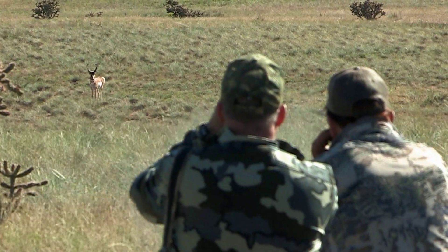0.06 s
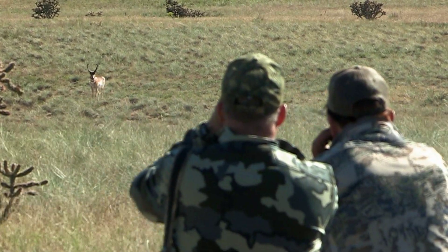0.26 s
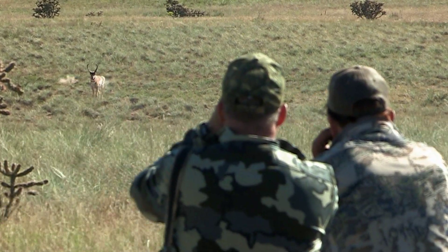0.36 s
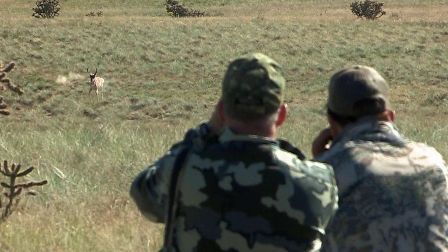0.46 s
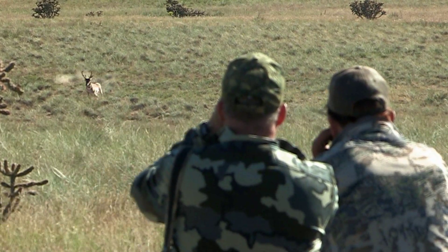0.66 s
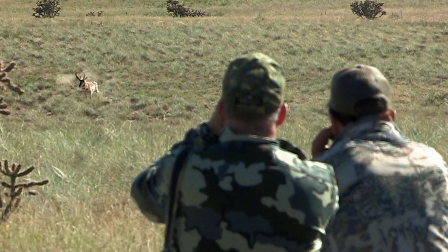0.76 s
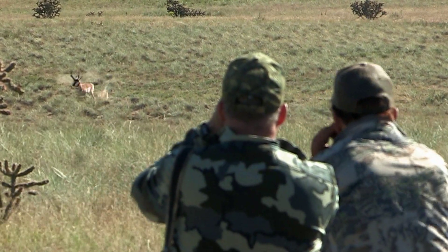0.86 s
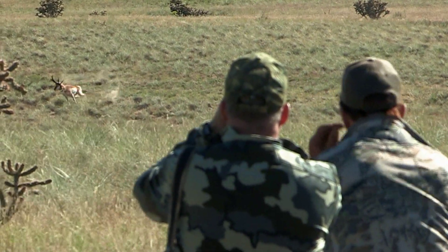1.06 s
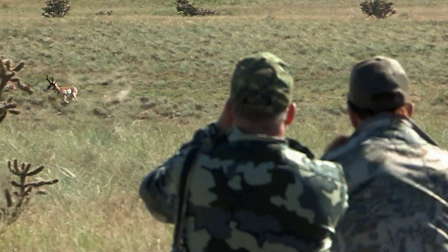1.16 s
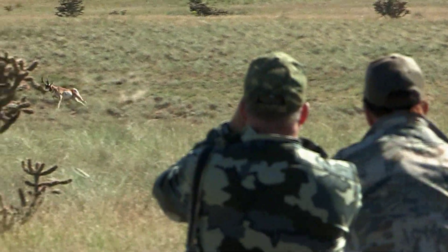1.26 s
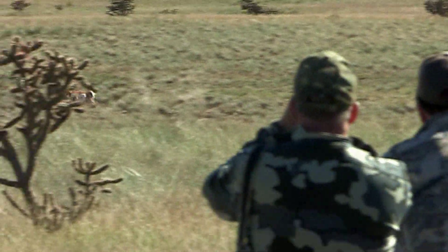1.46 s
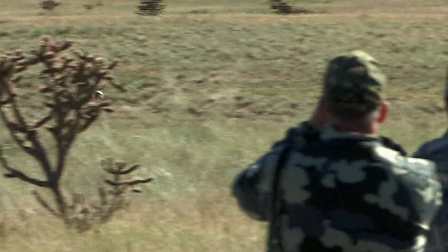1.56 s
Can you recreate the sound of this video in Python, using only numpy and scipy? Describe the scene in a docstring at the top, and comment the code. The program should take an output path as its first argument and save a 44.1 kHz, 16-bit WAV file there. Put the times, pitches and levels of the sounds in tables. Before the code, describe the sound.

A single rifle shot goes off at about 0.3 seconds, a bright crack running into a boom, close enough to overload the microphone. Its echo rolls across the open grassland, growing duller and fading over the next second. The bullet's soft, distant thud comes back at about 1 second, followed by a tiny dry tick near 1.2 seconds. Low wind buffets the microphone throughout, with some light rustling.

```python
"""Open, windy grassland: one rifle shot, close enough to overload the microphone.
A bright crack of shock fronts runs into the boom of the muzzle blast, and the land throws back
a rolling echo that dulls as it fades. The bullet's distant thud comes back late.
Wind buffets the microphone throughout, with some rustling and a few small ticks."""
import sys
import numpy as np
from scipy import signal
from scipy.fft import rfft, irfft
from scipy.io import wavfile
from scipy.ndimage import uniform_filter1d

SR = 44100
rng = np.random.default_rng(int(sys.argv[2]) if len(sys.argv) > 2 else 0)


def wav_out(sig):
    """Save sig, one row per channel (or a flat mono array), as 16-bit PCM at SR to the path in sys.argv[1]."""
    wavfile.write(sys.argv[1], SR, np.round(np.clip(np.atleast_2d(sig).T, -1, 1) * 32767).astype(np.int16))


N = 70560
T = np.arange(N) / SR
SHOT_S = 0.2702
SNAP_RISE_S, ECHO_RISE_S = 0.0012, 0.028


def amp(db):
    """Decibels to gain."""
    return 10 ** (np.asarray(db) / 20)


def unit(x):
    """Scales to rms 1."""
    return x / np.sqrt(np.mean(x ** 2) + 1e-20)


def read(points, hz):
    """Reads a table on a log-frequency axis."""
    f, value = np.transpose(points)
    return np.interp(np.log(hz + 1), np.log(f + 1), value)


def fader(points):
    """Gain ride through (time [s], level [dB]) points."""
    return amp(np.interp(T, *np.transpose(points)))


def coloured(x, colour):
    """Minimum-phase EQ that keeps the power of white noise."""
    hz = abs(np.fft.fftfreq(8192, 1 / SR))
    log_gain = np.log(unit(amp(read(colour, hz))))
    taps = np.fft.ifft(np.exp(np.conj(signal.hilbert(log_gain)))).real
    return signal.fftconvolve(x, taps[:len(taps) // 2])[:N]


def noise(colour):
    """Steady noise of rms 1 with the given spectrum."""
    gain = amp(read(colour, np.fft.rfftfreq(N, 1 / SR)))
    return unit(irfft(rfft(rng.standard_normal(N)) * gain, N))


def steadied(x, size):
    """Evens out the chance swells of a noise over `size` samples."""
    return x / np.sqrt(uniform_filter1d(x ** 2, size) + 1e-9)


def patchy(x, depth_db=2):
    """Lets narrow bands of a noise swell and sink by chance."""
    bands = signal.stft(x, nperseg=512, noverlap=384)[2]
    patches = uniform_filter1d(rng.standard_normal(bands.shape), size=5, axis=0)
    patches = unit(uniform_filter1d(patches, size=12, axis=1))
    return unit(signal.istft(bands * amp(depth_db * patches), nperseg=512, noverlap=384)[1][:N])


def burst(start, rise, hold, decay):
    """Envelope: straight attack, hold, exponential release, all in seconds."""
    age = T - start
    return np.clip(age / rise, 0, 1) * np.exp(-np.maximum(age - rise - hold, 0) / decay)


def wind():
    """Low buffeting on the microphone, air over the plain, rustling grass or clothing, a thin hiss."""
    # fader ride of each layer (time [s], level [dB])
    buffet_ride = [(0, -27), (.09, -26.5), (.12, -23.5), (.18, -29.5), (.22, -20.5), (.37, -26.5),
                   (.46, -21), (.51, -28), (.6, -26), (.74, -26.5), (.79, -33), (.97, -32), (1.25, -35),
                   (1.41, -34), (1.45, -27), (1.51, -30.5), (1.6, -29)]
    air_ride = [(0, -44.5), (.25, -39.5), (.9, -44.5), (1.12, -50.5), (1.3, -42), (1.45, -42.5), (1.6, -45)]
    rustle_ride = [(0, -41.5), (.032, -44), (.04, -34.5), (.06, -32), (.09, -41.5), (.14, -36), (.195, -38),
                   (.207, -29), (.265, -28), (.45, -44), (.6, -72), (1.1, -75), (1.21, -56.5), (1.26, -44),
                   (1.32, -55), (1.54, -72), (1.6, -47)]
    hiss_ride = [(0, -61), (.032, -68), (.04, -49), (.2, -50), (.33, -60), (.38, -44), (.48, -52),
                 (.56, -74), (.95, -93), (1.08, -75.5), (1.14, -65.5), (1.32, -66), (1.42, -58.5),
                 (1.52, -56.5), (1.6, -49.5)]
    # spectrum of each layer (frequency [Hz], level [dB])
    buffet_colour = [(10, -19), (30, 1.5), (60, 0), (110, -2.5), (160, -12), (260, -14), (450, -24),
                     (1000, -28), (4000, -44), (16000, -86)]
    air_colour = [(50, 8), (300, 2.5), (550, 2.5), (680, -8.5), (850, -8.5), (1100, -6), (1400, -2.5),
                  (1750, -6.5), (2300, -17), (3000, -24.5), (4000, -22.5), (8000, -29.5), (16000, -47)]
    rustle_colour = [(60, 5.5), (170, 15), (300, 11), (500, 3.5), (800, 4.5), (1500, -1.5), (3000, -3.5),
                     (6000, -7.5), (10000, -14), (13000, -20.5), (16000, -27)]
    hiss_colour = [(100, -20), (3000, -6), (6000, 4), (9000, 2.5), (12500, 2), (16000, -6)]
    buffet = fader(buffet_ride) * steadied(noise(buffet_colour), size=1800)
    air = fader(air_ride) * patchy(noise(air_colour))
    rustle = fader(rustle_ride) * patchy(noise(rustle_colour))
    hiss = fader(hiss_ride) * patchy(noise(hiss_colour))
    return buffet + air + rustle + hiss


def ticks(decay_s=0.00066):
    """Tiny dry clicks right by the microphone."""
    # each click (time [s], level [dB])
    clicks = [(.9410, -47.5), (1.1540, -46), (1.1793, -29.5)]
    # their bright spectrum (frequency [Hz], level [dB])
    colour = [(100, -22), (3000, -21), (5500, -13), (6700, -21), (8400, -16), (10000, -15), (12400, -1.5),
              (14500, -12), (16000, -14)]
    envelope = sum(amp(db) * burst(s, decay_s / 2, 0, decay_s) for s, db in clicks)
    return coloured(envelope * rng.standard_normal(N), colour)


def bullet_thud(slap_db=-20, slap_lead_s=0.00324):
    """The bullet lands far off: each hit is a soft pressure pulse with a short slap of noise."""
    # the thud and two small knocks after it (time [s], pulse width [s], level [dB])
    hits = [(1.007, 0.0013, -19.5), (1.031, 0.00047, -27), (1.052, 0.00037, -33)]
    # spectrum of the slap (frequency [Hz], level [dB])
    slap_colour = [(100, -3), (400, 9), (900, -3), (3200, 0), (6000, -10), (9000, -22), (12000, -44),
                   (16000, -47.5)]
    impacts = np.zeros(N)
    for s, width, db in hits:
        u = (T - s) / width
        pulse = (u ** 2 - 1) * np.exp(-u ** 2 / 2)
        envelope = burst(s - slap_lead_s, SNAP_RISE_S, hold=0, decay=0.0063)
        slap = coloured(rng.standard_normal(N) * envelope, slap_colour)
        impacts += amp(db) * (pulse + amp(slap_db) * slap)
    return impacts


def rolling_echo(roll_db=-19.5):
    """Countless reflections off the land, duller the longer their path, with a few stronger returns."""
    # spectra of the roll at its start and of the returns (frequency [Hz], level [dB])
    roll_colour = [(20, -14), (45, 4.5), (140, 5.5), (200, -7.5), (300, -1.5), (600, -5), (1100, -14),
                   (2300, -16.5), (4000, -21.5), (8000, -21), (12000, -31), (16000, -31)]
    return_colour = [(60, -6), (150, 11), (300, -6), (700, 3.5), (1100, -3.5), (1600, 5), (2600, -2),
                     (4000, -8), (7000, -16), (16000, -52)]
    # length of the tail (frequency [Hz], time to fall 60 dB [s])
    t60 = [(40, 1.5), (300, 1.96), (1000, 2.1), (2500, 2.1), (5000, 1.45), (8000, 0.92), (12000, 0.8),
           (16000, 0.36)]
    # returns from slopes and brush (time [s], width [s], level [dB])
    returns = [(0.402, 0.0094, -27.5), (.464, 0.015, -28.5), (.60, 0.014, -39), (.67, 0.027, -40),
               (.74, 0.016, -41), (0.853, 0.017, -42), (.92, 0.019, -46.5)]
    white = rng.standard_normal(N)
    grain_db = unit(uniform_filter1d(rng.standard_normal(N), size=90))
    reflections = coloured(unit(white * amp(grain_db)), roll_colour)
    hz, t, bands = signal.stft(reflections, SR, nperseg=512, noverlap=384)
    fading = amp(-60 * np.maximum(t - SHOT_S, 0) / read(t60, hz)[:, None])
    roll = signal.istft(bands * fading, SR, nperseg=512, noverlap=384)[1][:N]
    attack = np.clip((T - SHOT_S) / ECHO_RISE_S, 0, 1)
    swells = sum(amp(db) * np.exp(-.5 * ((T - s) / width) ** 2) for s, width, db in returns)
    return amp(roll_db) * attack * roll + swells * noise(return_colour)


def muzzle_blast(attack_s=0.0013, push_hz=84, push_db=-11.5):
    """A punch and a low push of air, then a hollow boom, its deep body and scatter off nearby ground."""
    # resonances of each layer (frequency [Hz], level [dB])
    punch_colour = [(30, -8), (90, -2), (260, -3), (450, 3), (800, 2), (1150, -15), (1700, -0.5),
                    (2700, -9), (4000, -12), (16000, -52)]
    boom_colour = [(40, -9), (200, -15), (340, 3.5), (415, -19.5), (505, 9), (585, -8), (650, 11),
                   (790, -11), (915, 0), (1060, -18.5), (1700, -14.5), (2600, -23.5), (4000, -35.5),
                   (8000, -32.5), (16000, -46)]
    body_colour = [(40, -25), (130, -11), (195, -20), (245, 6.5), (295, 3), (345, 3.5), (400, -17),
                   (600, -33), (16000, -80)]
    scatter_colour = [(40, -16), (170, -8), (280, 9), (460, 3), (680, 3), (900, -2), (1300, -10),
                      (3000, -30), (8000, -32), (16000, -57)]

    def swell(colour, db, rise, hold, decay):
        """Resonant noise under an envelope that starts with the shot."""
        return amp(db) * burst(SHOT_S, rise, hold, decay) * steadied(noise(colour), size=400)

    low_tone = -np.sin(2 * np.pi * push_hz * (T - SHOT_S))
    push = amp(push_db) * burst(SHOT_S, attack_s, hold=0, decay=0.022) * low_tone
    punch = swell(punch_colour, db=-8.5, rise=attack_s, hold=0.0051, decay=0.0067)
    boom = swell(boom_colour, db=-4.5, rise=0.021, hold=0.00695, decay=0.014)
    body = swell(body_colour, db=-8.5, rise=0.031, hold=0.0063, decay=0.0081)
    scatter = swell(scatter_colour, db=-14.5, rise=ECHO_RISE_S, hold=0, decay=0.074)
    return push + punch + boom + body + scatter


def crack(fizz_s=0.0027, fizz_db=-13):
    """A brief fizz leads into a volley of shock fronts, each trailing scatter from the grass."""
    # the shock fronts and their nearest reflections (time [s], level [dB], decay [s])
    fronts = [(.2700, -5.5, 0.0025), (0.274, -17, 0.0027), (0.2757, -13.5, 0.0036), (0.281, -13, 0.0016),
              (0.2822, -6.5, 0.0035), (0.287, -9, 0.0018), (0.2925, -10, 0.002), (0.302, -35.5, 0.0028),
              (0.315, -16, 0.0023), (.3255, -23, 0.0012)]
    # spectrum of the crack (frequency [Hz], level [dB])
    colour = [(60, 8.5), (500, 3.5), (1150, -3.5), (1750, -2.5), (2250, -3.5), (2750, 4.5), (3300, -6),
              (4100, -1.5), (4800, -9.5), (5800, -4), (7200, -13.5), (12000, -12.5), (16000, -17)]
    volley = sum(amp(db) * burst(s, SNAP_RISE_S, 0, decay) for s, db, decay in fronts)
    fizz = amp(fizz_db) * burst(SHOT_S - fizz_s, fizz_s, 0, fizz_s)
    spray = steadied(rng.standard_normal(N), size=40)
    return coloured((volley + fizz) * spray, colour)


def scene():
    """The shot, its echo and far impact over the wind bed, in mono."""
    return (crack() + muzzle_blast() + rolling_echo() + bullet_thud() + ticks() + wind())[None]


def record(dry):
    """The input overloads into a soft clip; a steep low-pass trims the very top."""
    knee, cutoff_hz = 4, 15800
    clipped = dry / (1 + abs(dry) ** knee) ** (1 / knee)
    low_pass = signal.firwin(511, cutoff_hz, window=("kaiser", 9), fs=SR)
    return signal.oaconvolve(clipped, low_pass[None], "same")


dry = scene()
out = record(dry)
wav_out(out)
```